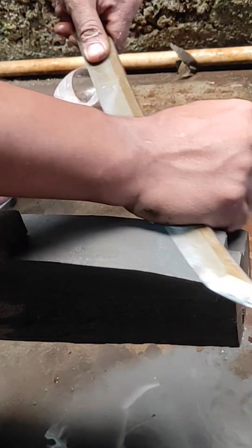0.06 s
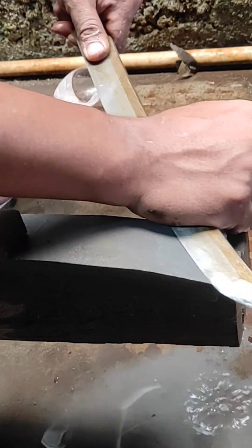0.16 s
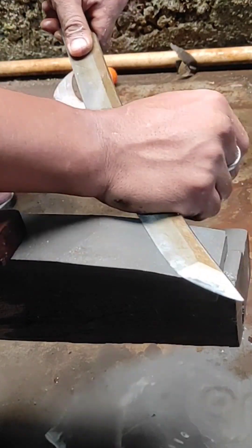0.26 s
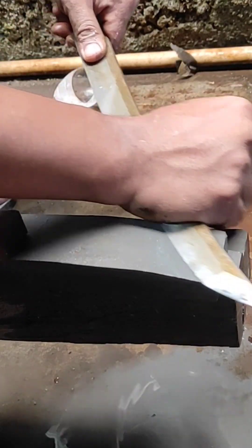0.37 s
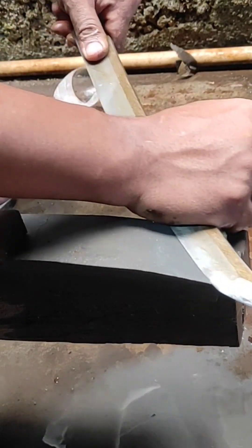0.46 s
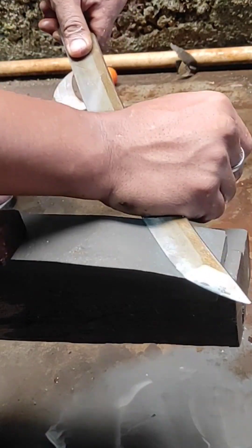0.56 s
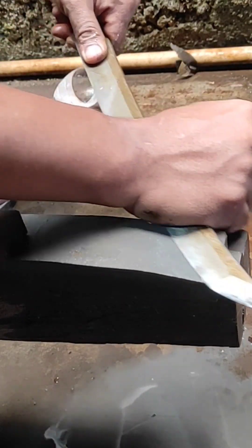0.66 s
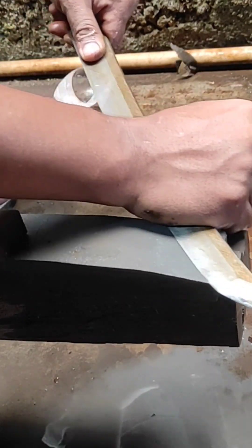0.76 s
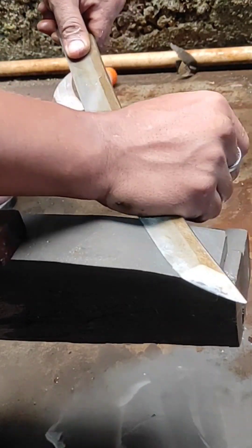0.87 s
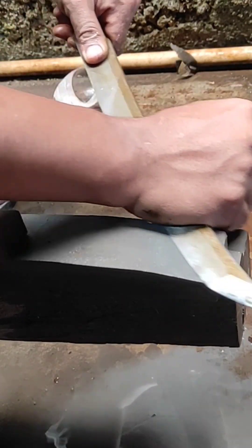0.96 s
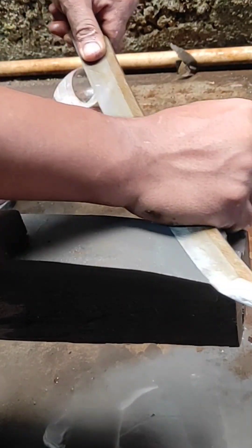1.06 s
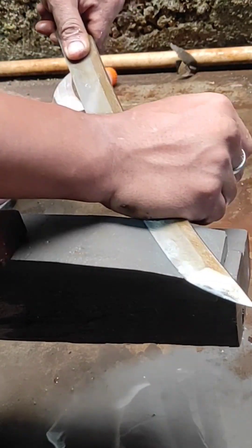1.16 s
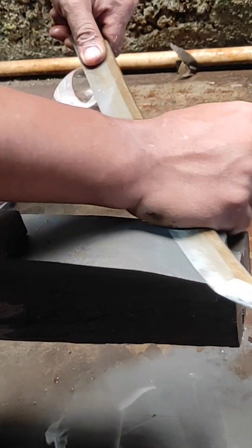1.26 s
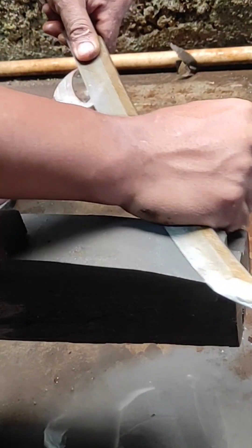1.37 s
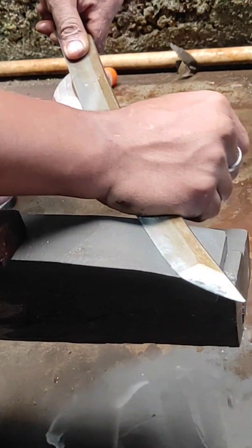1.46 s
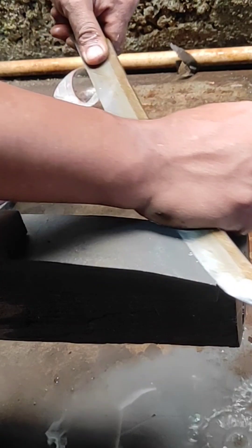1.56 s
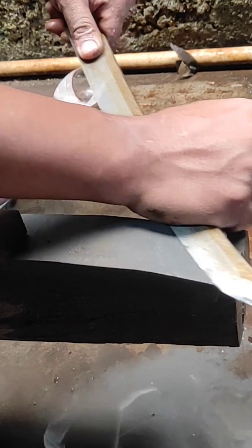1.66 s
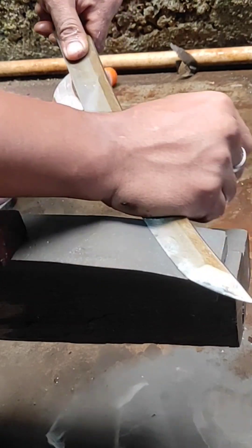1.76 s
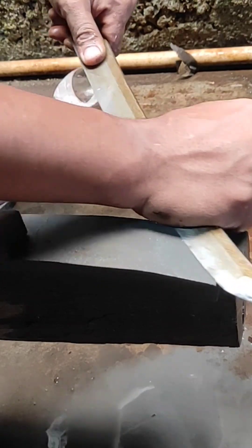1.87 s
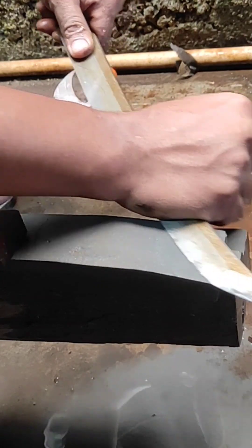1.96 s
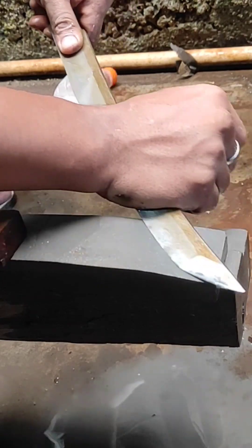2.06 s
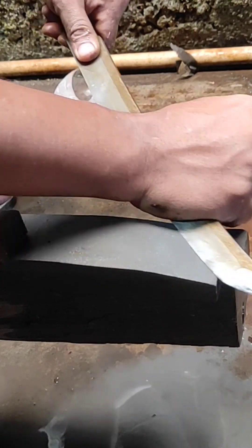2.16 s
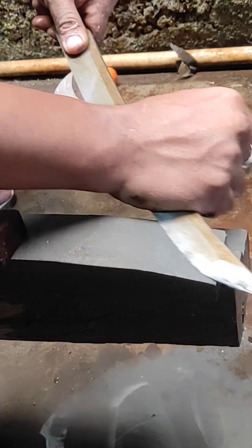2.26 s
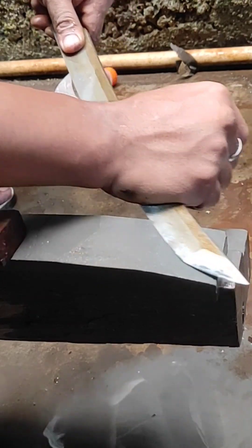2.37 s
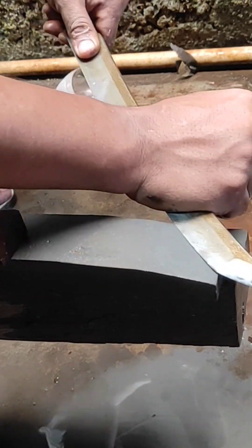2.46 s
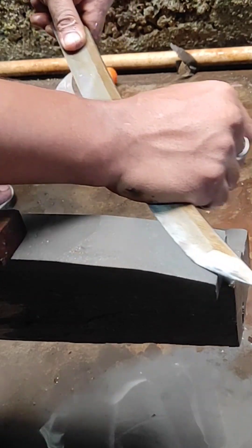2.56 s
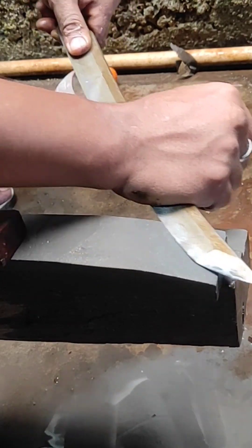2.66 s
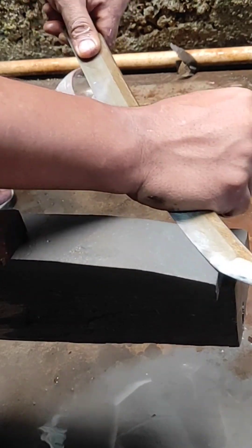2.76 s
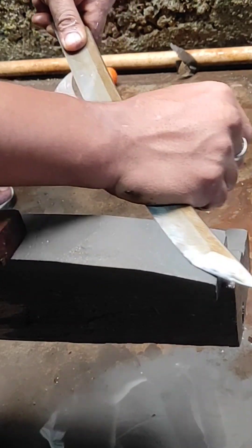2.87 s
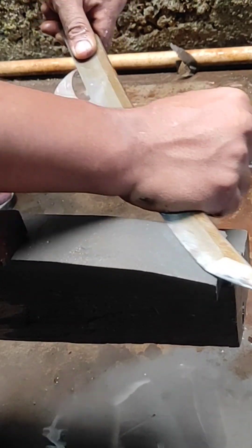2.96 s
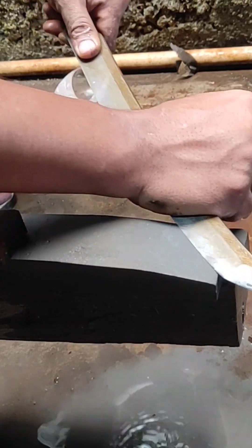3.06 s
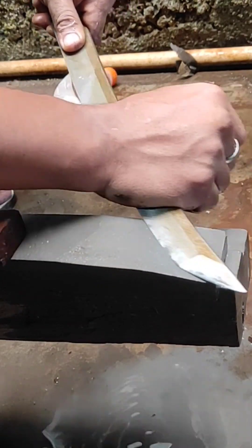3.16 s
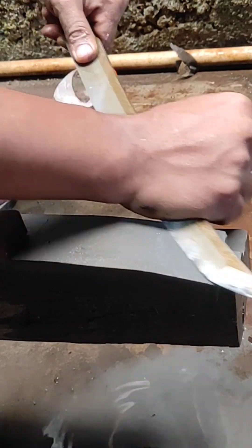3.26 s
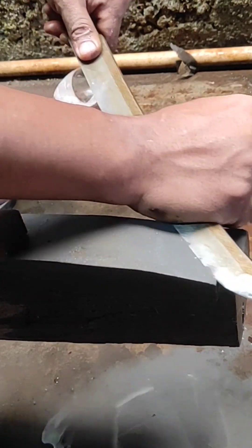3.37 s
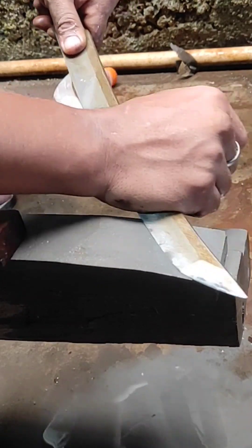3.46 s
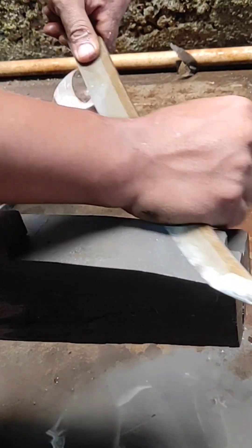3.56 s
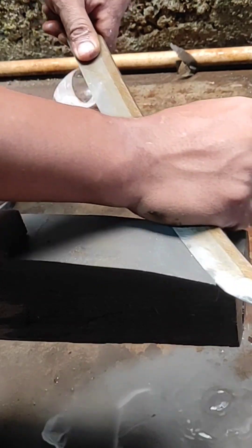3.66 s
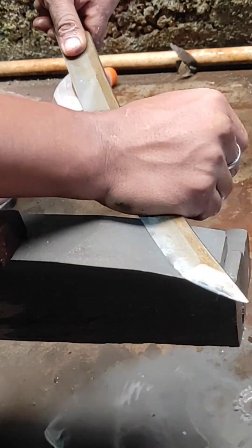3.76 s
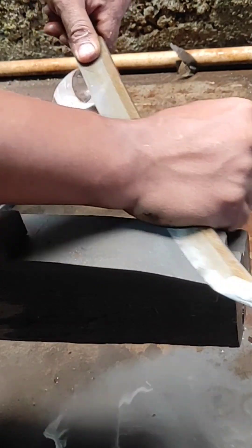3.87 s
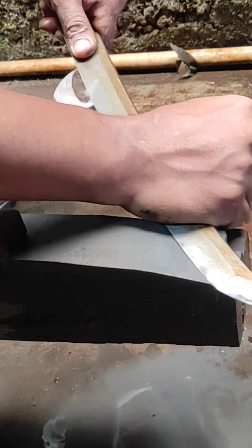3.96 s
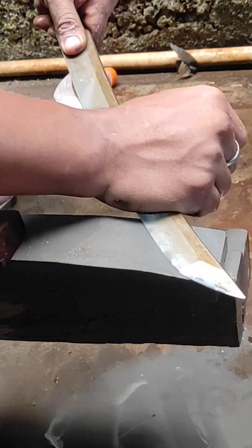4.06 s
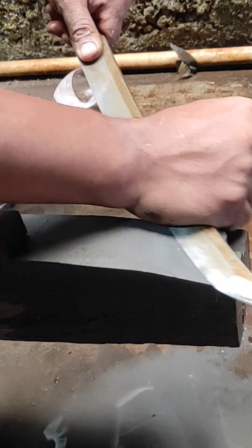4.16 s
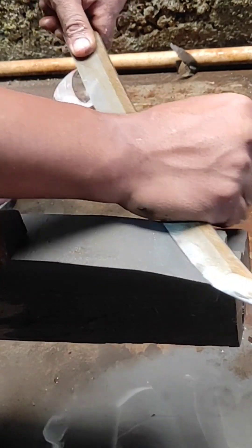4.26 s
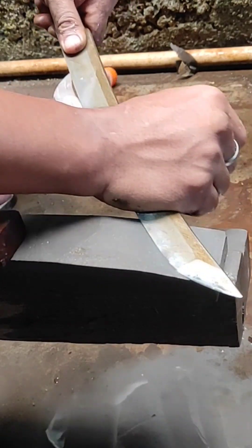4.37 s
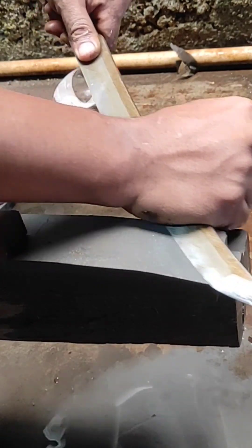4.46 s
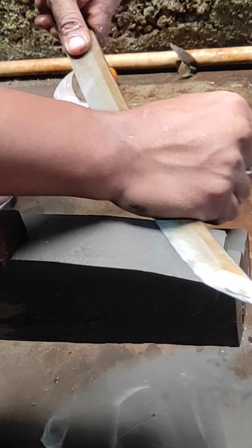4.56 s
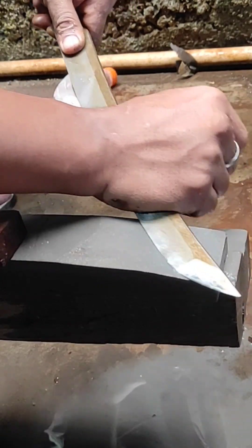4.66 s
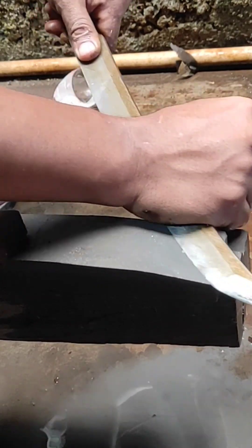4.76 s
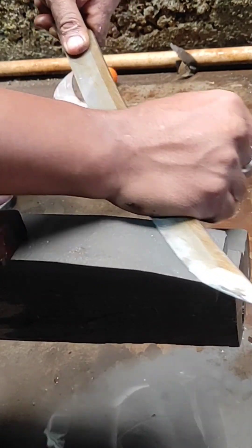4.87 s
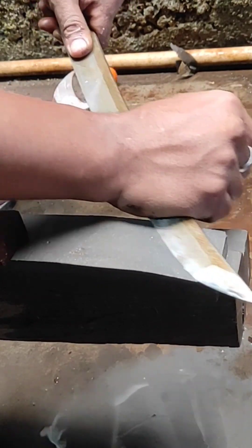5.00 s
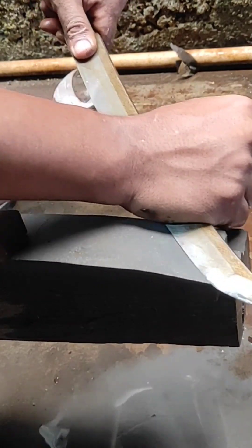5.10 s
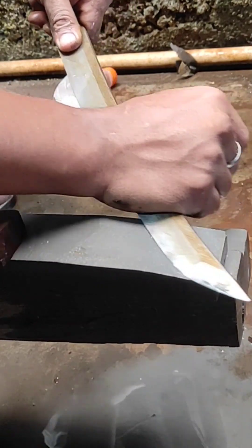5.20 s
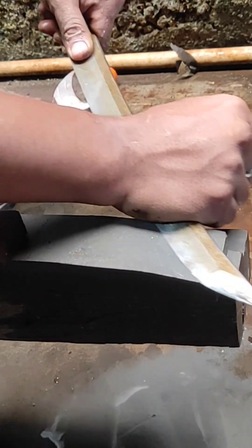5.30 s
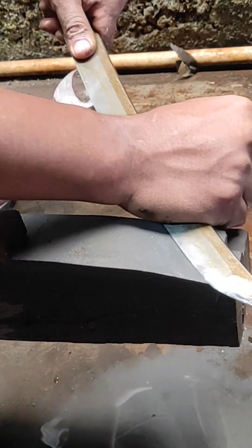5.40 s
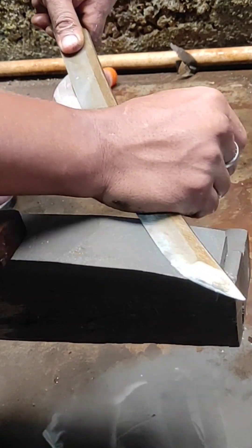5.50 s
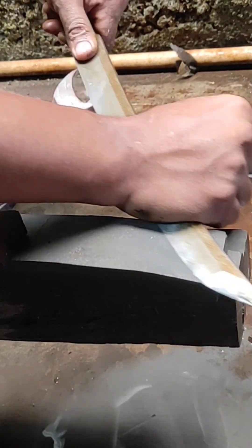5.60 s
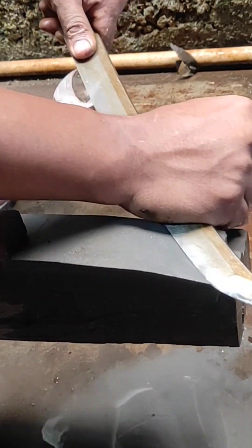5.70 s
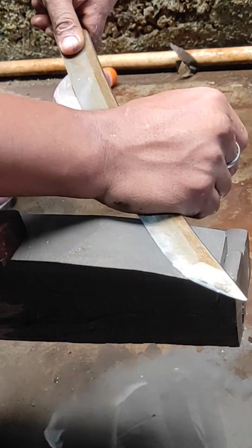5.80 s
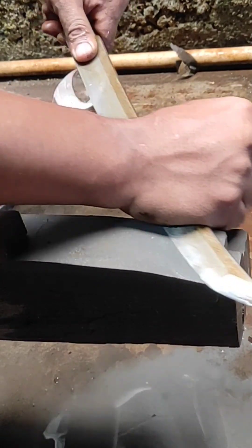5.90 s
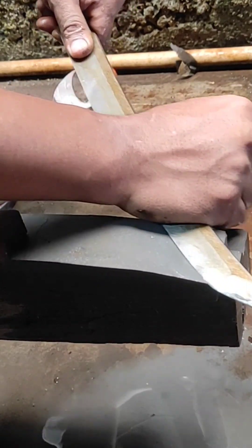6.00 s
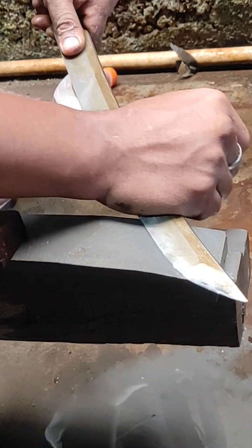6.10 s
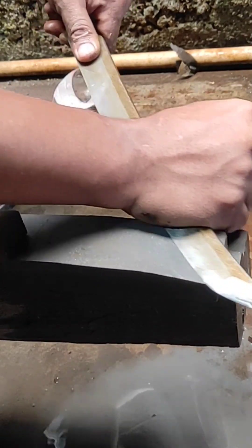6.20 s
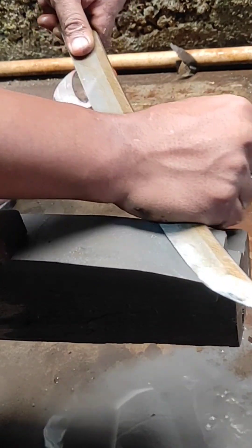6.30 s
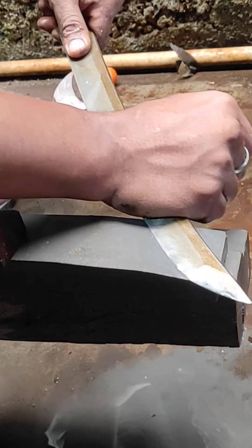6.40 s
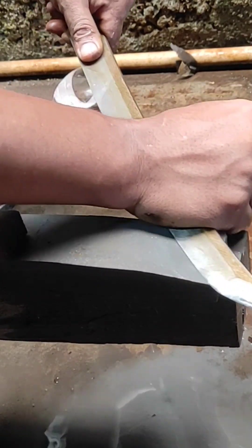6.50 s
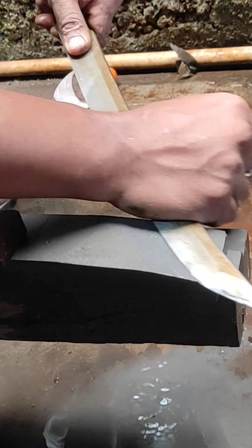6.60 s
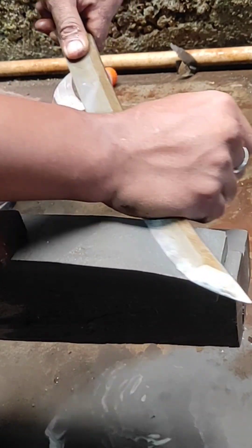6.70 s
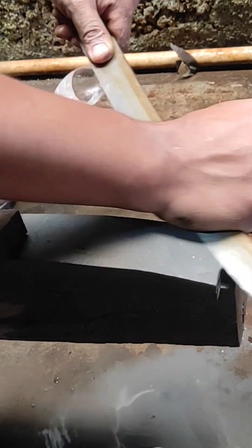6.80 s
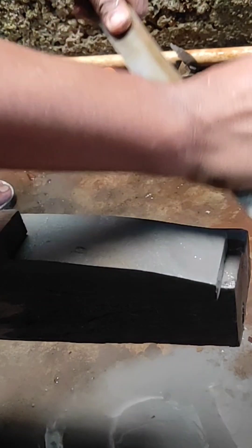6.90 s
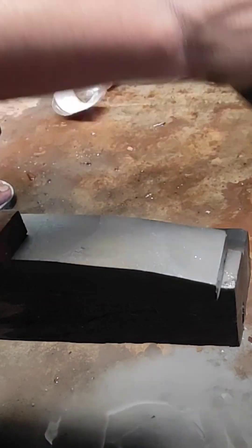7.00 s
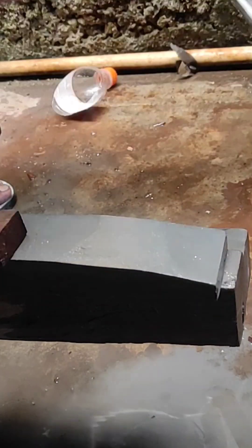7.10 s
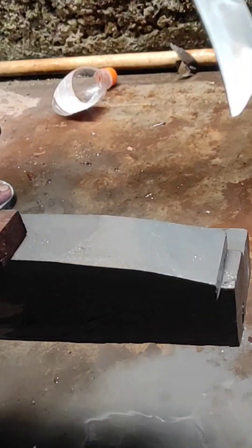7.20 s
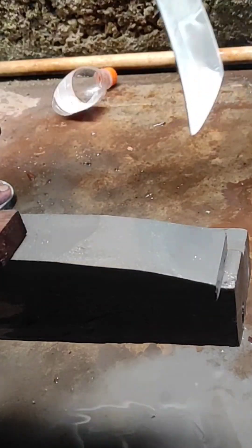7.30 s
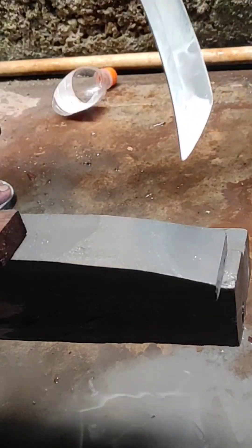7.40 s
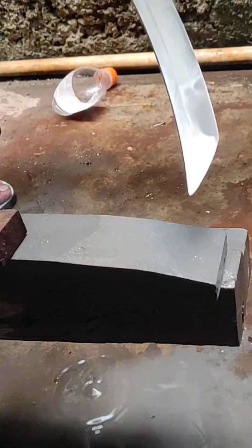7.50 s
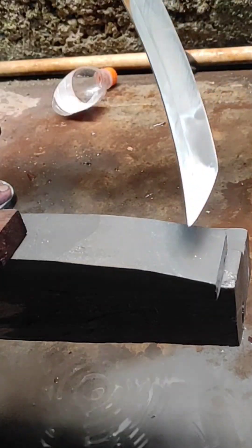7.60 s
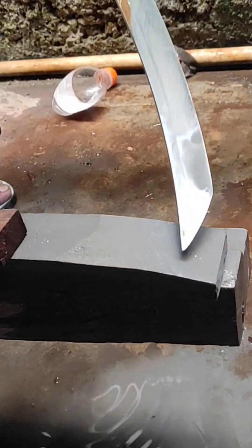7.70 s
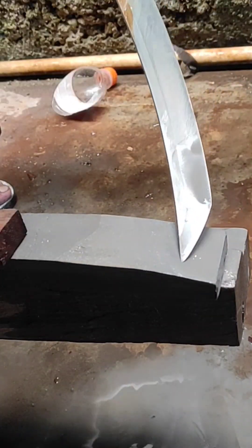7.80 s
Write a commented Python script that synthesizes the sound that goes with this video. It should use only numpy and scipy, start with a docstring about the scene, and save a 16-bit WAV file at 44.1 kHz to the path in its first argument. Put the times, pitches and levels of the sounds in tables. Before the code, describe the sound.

A long steel blade rasps quickly back and forth on a wet whetstone, hissing brightly, then lifts away and its tip ticks down with a short ring.

```python
"""A long steel blade on a wet whetstone, close to a phone: about seven strokes a second, pushed and drawn.
Noise for the grit rasps on the stone and hisses through the blade's resonances; the blade is lifted, faint
noise dies away, and its tip touches down, ringing as decaying sines over a gritty scuff.
The yard walls answer with a short noise tail. Farther off a motorbike passes and engines drone as sines,
road rumble and open air are shaped noise, and a few dull bumps sit low under the scraping."""
import sys
import numpy as np
from scipy import signal
from scipy.fft import rfft, irfft, next_fast_len
from scipy.io import wavfile
from scipy.ndimage import map_coordinates

SR = 44100
rng = np.random.default_rng(int(sys.argv[2]) if len(sys.argv) > 2 else 0)


def store_wav(level_fs):
    """Save 16-bit WAV to argv[1]."""
    pcm = np.round(np.clip(np.atleast_2d(level_fs), -1, 1) * 32767)
    wavfile.write(sys.argv[1], SR, pcm.T.astype(np.int16))


N = 346185  # samples

# The blade pushed, edge first, until the next draw: start_s, steel_hiss_db, stone_rasp_db,
# climb_db (pressure over the stroke), easing_db (of the hand halfway)
PUSH_STROKES = [(0.065, -26.5, -38, 4.0, -0.5), (0.368, -26.5, -37.0, 4, 1.0), (0.657, -27, -37.5, -1.5, 0),
                (0.954, -26, -37.5, 8, 0.5), (1.25, -27.5, -37.5, 5, 1), (1.55, -24, -35.5, -6.5, 0),
                (1.85, -26, -36, -5, 0.0), (2.139, -25.0, -36.5, -7, 0.0), (2.417, -26.5, -38, -4, -1.5),
                (2.689, -28.5, -38, 5, 0.5), (2.974, -28.5, -37.5, -7, -2), (3.26, -26.5, -37.0, 3, 1),
                (3.568, -25.0, -35.5, 2, -1), (3.851, -26.5, -36.5, 2, -0.5), (4.154, -25.5, -36.5, -1, -1),
                (4.441, -26.0, -36.5, 2.0, -1.0), (4.726, -26.5, -38, 2.5, -1.0),
                (5.015, -26.5, -37.5, 3, 0.0), (5.302, -27.5, -38.5, 3, -0.5), (5.593, -27.0, -38.5, 7, -1),
                (5.885, -27.0, -37.5, -1.5, 0), (6.163, -28.0, -38.5, 10, 0), (6.458, -28.0, -38.5, 2, 0),
                (6.744, -24, -37.5, 5, -1)]
# The blade drawn back until the next push: start_s, steel_hiss_db, stone_rasp_db, climb_db, easing_db
DRAW_STROKES = [(-0.074, -30, -36.5, 1, -2.5), (0.201, -31.0, -39.0, 13, 1.5), (0.509, -32.0, -39, 4, 0.0),
                (0.804, -31.5, -38.5, 10, -0.5), (1.098, -33.0, -40.5, 0.5, 2),
                (1.389, -32.5, -39.5, 9, 1.5), (1.688, -31.0, -38.5, 1.5, 1.5),
                (1.98, -28.5, -37.5, 2, 1.0), (2.273, -28, -37, 6, 0.5), (2.553, -30.0, -38, 7.0, -2),
                (2.824, -33, -37.5, 16, -3), (3.13, -30, -37, 2.0, -0.5), (3.406, -31, -38, 0, 1.5),
                (3.7, -32.5, -40.5, 1.5, -2), (3.985, -33.5, -43.5, 4, 0.5), (4.279, -33.5, -43.5, 4, 1),
                (4.565, -35.0, -44.5, 8.0, 1.5), (4.856, -34.5, -43.5, 1, 1.5),
                (5.144, -36.0, -45.5, 13.5, 1.5), (5.43, -35.0, -43, 10.0, 0.5),
                (5.722, -34.5, -42, 9.0, -1), (6.014, -33.5, -42.5, 12, 0), (6.291, -34.5, -44.0, 6, 1.5),
                (6.587, -34.0, -43.0, 5, -0.5)]
LIFT_S = 6.9  # the blade leaves the stone
# Shape of each direction: knee_speed (0-1), extra_rasp_climb_db
PUSH_CURVE = (0.51, 3.2)
DRAW_CURVE = (0.39, 0.89)
RASP_FOLLOWS = 0.51  # dB of rasp per dB of pressure
# Where the edge skates, then suddenly digs in; a row of zero swing does nothing and is skipped:
# at_s, pressure_swing_db (either way)
EDGE_DIGS = [(1.572, 1), (2.157, 2.5), (3.153, 4), (6.183, 0), (6.48, 2.3)]
DIG_ABRUPT_S, DIG_FADE_S = 0.002, 0.015
CATCH_AFTER_S, CATCH_DB = 0.016, 0.3  # every push also catches a little just after the turn
# Resonances of the blade on the stone: centre_hz, width_hz, left_db, right_db,
# draw_db (extra on the way back), likeness (left to right, 0-1), left_lead_rad
BLADE_RESONANCES = [(1085, 247, 7.5, 3.5, -5, 0.13, 1.5), (1718, 460, 8.1, 6, 0.4, 0.44, 1),
                    (2293, 195, 7.5, 9.5, 0, 0.34, -1.1), (2760, 320, 8, 7, -2, 0.56, -4),
                    (3864, 560, 8.5, 10.5, -1.5, 0.4, 2.25), (4750, 260, 3.5, 8.0, 3, 0.4, -3),
                    (5510, 920, 3, 8, 1, 0.4, -2.5), (6370, 200, 1, 7.5, 5.5, 0.5, -1),
                    (6860, 380, -4, 7, -1, 0.06, 1), (7360, 327, 1.5, 8.5, 4, 0.52, -1.5),
                    (7670, 438, 2.5, 9, -5, 0.2, -0.4), (8264, 510, 8.5, 2.6, 4, 0.12, 1.5),
                    (8920, 300, -1, -1.4, -0.5, 0.67, -2.5), (9340, 180, 8.5, 5.5, 5, 0.82, 3)]
# Bare friction of grit on stone: freq_hz, density_db (per Hz)
FRICTION_SPECTRUM = [(60, -32.5), (220, -19), (400, -19.5), (540, -21), (660, -19), (1300, -23.5),
                     (3200, -26.5), (4400, -27.5), (6000, -21.5), (7500, -17), (8700, -18), (9500, -22.5),
                     (10600, -27.5), (12900, -34.5), (14000, -36.5), (15300, -48.5)]
# The tip lands, catches and skids: at_s, ring_db, scuff_db
TIP_CATCHES = [(7.8214, -25.5, -33.5), (7.8272, -30, -33.5), (7.8331, -28.5, -34)]
# Ring of the free blade: pitch_hz, left_db, right_db, t60_s
FREE_BLADE_MODES = [(344, -18, -22, .2), (1930, -29, -31, .15), (2480, -29, -28, 0.13),
                    (3200, -17, -15, 0.22), (3924, -21, -16, .1), (4727, -21, -4, .05),
                    (5680, -21, -7, .06), (6476, -22, -11, .15), (7467, -12, 5.5, 0.11),
                    (8506, -3, -3, .18), (14130, -31, -31, .15)]
# The tip scraping the stone: freq_hz, density_db (per Hz)
SCUFF_SPECTRUM = [(100, -15), (350, -12), (1100, -11.5), (2100, -20.5), (3300, -19), (5500, -13),
                  (7500, -9), (9500, -15), (15000, -38.5)]
# Faint noise after the lift, a slow dying tail, then a brief swish: centre_s, half_length_s, level_db
FAINT_SWELLS = [(7.052, 0.18, -55.5), (7.28, 0.086, -62), (7.53, .045, -56)]
# Decay of the walls' echo: freq_hz, t60_s
WALL_DECAY = [(200, 0.89), (2000, 0.35), (8000, 0.27), (15000, 0.16)]
ECHO_DB = -7
# The motorbike: mean firing rate, Doppler shift either way, moment and half-time of the glide
FIRING_HZ, DOPPLER_HZ, GLIDE_AT_S, GLIDE_S = 43.35, 0.92, 2.85, 0.85
# Its pass, before swells and panning: nearest_s, half_time_s, fifth_order_db
MOTORBIKE_PASS = (1.56, 2.4, -50.5)
# Its exhaust: order (multiple of the firing rate), level_db (relative to the fifth)
EXHAUST_ORDERS = [(2, -16), (3, -18), (4, -7), (5, 0), (6, -9), (7, -15), (8, -16), (9, -17)]
# Its note swells and sinks: centre_s, half_length_s, change_db
MOTORBIKE_SWELLS = [(0.1, 0.2, 2.5), (1.297, 0.15, 9), (1.55, 0.045, -4), (1.767, 0.18, 6),
                    (1.94, 0.033, -12), (2.06, 0.29, 4.5), (2.61, 0.13, -15), (3.113, 0.27, 10.5),
                    (3.518, 0.07, 7.5), (4.317, 0.065, 10.5)]
# Far engines, before panning: start_s, end_s, pitch_hz, level_db
ENGINE_DRONES = [(-.1, 1.8, 118.3, -53), (.3, 2.9, 140.5, -59), (2.1, 2.95, 87.3, -51.5),
                 (4.5, 6.5, 99.5, -53.5), (4.1, 8, 66.5, -61)]
# Other traffic, heard only as rumble, before its trim and panning: nearest_s, half_time_s, level_db
RUMBLE_PASSES = [(0.55, 0.45, -45.5), (3.65, 0.35, -40), (5.1, 1, -45.5)]
# Road rumble: freq_hz, density_db (per Hz)
RUMBLE_SPECTRUM = [(20, -16.5), (45, -4), (90, -0.5), (170, -1), (280, -2), (450, -7), (900, -14.5),
                   (3000, -46)]
# Dull bumps, before panning: start_s, level_db, pitch_hz
BUMPS = [(3.335, -38, 48), (3.39, -34, 80), (3.44, -39, 60), (3.51, -34, 98), (3.564, -34, 90),
         (3.635, -33, 62), (3.642, -38, 184), (3.68, -33.5, 170), (3.73, -33, 126), (3.739, -36, 248)]
# Noise in the bumps: freq_hz, density_db (per Hz)
BUMP_SPECTRUM = [(20, -19), (45, 5), (90, 2), (170, -6), (270, -4), (500, -19), (1500, -60)]
# Outdoor background: freq_hz, density_db (per Hz)
AIR_SPECTRUM = [(15, -42), (25, -10.5), (69, -14.5), (110, -19), (163, -4), (200, -14.5), (250, -25),
                (383, -17), (600, -27.5), (1500, -30), (3440, -34), (5720, -37), (7280, -25.5),
                (9770, -37.5), (13800, -64), (15000, -60)]
# How alike noise is at the two microphones: freq_hz, likeness (0-1)
MIC_LIKENESS = [(60, 1), (290, 0.89), (640, 0.7), (1400, 0.052), (3000, 0), (15000, 0.068)]
# Notches in the treble: centre_hz, width_hz, depth_db
TREBLE_NOTCHES = [(9920, 610, -29.5), (11100, 390, -23), (12350, 260, -6), (13450, 230, -1)]
TOP_HZ = 15450  # band limit


def grinding(rasp_knee=0.32, split_hz=3900, hiss_trim_db=0.24, detune=0.012, vary_db=1.3):
    """Each stroke speeds up and stops under the hand's pressure: stone rasp below split_hz, steel hiss above."""
    sliding = shifting(stereo_noise(FRICTION_SPECTRUM), depth_db=3.4, patch_hz=130, patch_s=0.045)
    # single grains catch for under a millisecond; coarse grit makes the stone judder more slowly
    grain_db = 1.35 * wobble(1300) + 0.3 * wobble(90)
    grit = unit(sliding * amp(grain_db))
    judder = amp(0.9 * wobble(350))
    rows = strokes()
    # per stroke: (early, late) by (detune, level) by resonance
    chance = rng.standard_normal((len(rows), 2, 2, len(BLADE_RESONANCES)))
    out = np.zeros((2, N))
    for (start, end, drawn, hiss_db, rasp_db, climb_db, ease_db), lies in zip(rows, chance):
        knee, extra_climb_db = DRAW_CURVE if drawn else PUSH_CURVE
        span = np.arange(max(0, int(start * SR)), int(end * SR))
        t = span / SR
        done = (t - start) / (end - start)  # 0-1 through the stroke
        speed = np.sin(np.pi * done)
        easing_db = ease_db * np.cos(2 * np.pi * (2 * done - 1)) * speed
        pressure_db = climb_db * (done - 0.5) - easing_db + digging(t)

        # the blade lies differently at the two ends of every stroke
        early, late = [
            filtered(grit[:, span], lambda hz: blade_colour(hz, drawn, detune * shift, vary_db * change))
            for shift, change in lies]
        travelled = np.sin(np.pi * done / 2) ** 2
        scrape = at_both_microphones(early + (late - early) * travelled)

        rasp = filtered(scrape, lambda hz: 1 / (1 + (hz / split_hz) ** 8))
        hiss = scrape - rasp
        hiss_gain = amp(hiss_db + hiss_trim_db + pressure_db) * bite(speed, knee)
        rasp_level_db = rasp_db + RASP_FOLLOWS * pressure_db + extra_climb_db * (done - 0.5)
        rasp_gain = amp(rasp_level_db) * bite(speed, rasp_knee)
        out[:, span] += hiss_gain * unit(hiss)
        out[:, span] += rasp_gain * unit(rasp * judder[span])
    return out


def strokes():
    """Draw and push in turn: start_s, end_s, drawn, steel_hiss_db, stone_rasp_db, climb_db, easing_db."""
    rows = [row for pair in zip(DRAW_STROKES, PUSH_STROKES) for row in pair]
    ends = [row[0] for row in rows[1:]] + [LIFT_S]
    return [(start, end, k % 2 == 0, *levels)
            for k, ((start, *levels), end) in enumerate(zip(rows, ends))]


def bite(speed, knee, creep=0.28):
    """The grit cuts evenly once past the knee speed; at the turns the blade only creeps sideways."""
    cut = speed ** 2 * (1 + knee ** 2) / (speed ** 2 + knee ** 2)
    return np.hypot(creep, cut)


def digging(t):
    """Pressure in dB: it sags while the edge skates and jumps as it digs in."""
    digs = [(s, db) for s, db in EDGE_DIGS if db != 0]
    catches = [(start + CATCH_AFTER_S, CATCH_DB) for start, *_ in PUSH_STROKES]
    return sum(db * np.tanh((t - s) / DIG_ABRUPT_S) * np.exp(-np.abs(t - s) / DIG_FADE_S)
               for s, db in digs + catches if t[0] < s < t[-1])


def shifting(x, depth_db, patch_hz, patch_s):
    """Narrow random peaks and dips that come and go in the scraping noise."""
    hz, t, z = signal.stft(x, SR, nperseg=1024)
    knots = rng.standard_normal((int(t[-1] / patch_s) + 4, int(hz[-1] / patch_hz) + 4))
    field = map_coordinates(knots, np.meshgrid(t / patch_s, hz / patch_hz), order=2)
    field = np.minimum(field, 1.2)  # peaks are limited
    return signal.istft(z * amp(depth_db * field), SR, nperseg=1024)[1][:, :N]


def blade_colour(hz, drawn, detune, change_db):
    """Left and right gain of the blade's resonances for one way of lying on the stone."""
    centre, width, left_db, right_db, draw_db, *_ = np.transpose(BLADE_RESONANCES)
    offset = hz - (centre * (1 + detune))[:, None]
    peaks = 1 / (1 + (offset / (width[:, None] / 2)) ** 2)
    heights_db = np.array([left_db, right_db]) + drawn * draw_db + change_db
    return amp(heights_db @ peaks)


def at_both_microphones(x):
    """Each resonance reaches the two microphones partly as one wave, with its own phase between them."""
    centre, width, *_, likeness, lead = np.transpose(BLADE_RESONANCES)

    def shared(hz):
        near = np.exp(-((hz - centre[:, None]) / width[:, None]) ** 2)
        return (likeness * np.exp(-1j * lead)) @ near

    def own(hz):
        return np.sqrt(np.clip(1 - np.abs(shared(hz)) ** 2, 0, 1))

    right = filtered(x[0], shared) + filtered(x[1], own)
    return np.array([x[0], right])


def tip_touch(scuff_t60=0.071, attack=0.0008):
    """The tip lands and skids: every catch feeds the ring of the free blade and adds a gritty scuff."""
    out = np.zeros((2, N))
    scuff = unit(stereo_noise(SCUFF_SPECTRUM) * amp(1.5 * wobble(900)))
    phases = rng.uniform(0, 2 * np.pi, (len(FREE_BLADE_MODES), 2, 1))
    for s, ring_db, scuff_db in TIP_CATCHES:
        first = int(s * SR)
        t = np.arange(N - first) / SR
        ring = np.zeros((2, N - first))
        for (hz, left_db, right_db, t60), phase in zip(FREE_BLADE_MODES, phases):
            fade = amp(np.array([[left_db], [right_db]]) - 60 * t / t60)
            ring += fade * np.sin(2 * np.pi * hz * (t + first / SR) + phase)
        skid = amp(scuff_db - 60 * t / scuff_t60) * scuff[:, first:]
        out[:, first:] += (1 - np.exp(-t / attack)) * (amp(ring_db) * ring + skid)
    return out


def faint_noise():
    """Faint noise after the lift: a slow dying tail, then a brief swish, from bell-shaped swells."""
    t = np.arange(N) / SR
    level = sum(amp(db) * np.exp(-((t - s) / half_s) ** 2) for s, half_s, db in FAINT_SWELLS)
    return level * unit(stereo_noise(SCUFF_SPECTRUM) * amp(2 * wobble(60)))


def yard(x):
    """The walls' answer: a half-second noise tail whose treble dies first."""
    hz, t, z = signal.stft(rng.standard_normal((2, SR // 2)), SR, nperseg=256)
    decay = amp(-60 * t / along(WALL_DECAY, hz)[:, None])
    tail = signal.istft(z * decay, SR, nperseg=256)[1]
    return signal.fftconvolve(x, tail / np.linalg.norm(tail[0]), axes=1)[:, :N]


def traffic():
    """Distant motorbike, droning engines and road rumble, all to the left."""
    tones = motorbike() + drones()
    # the root of two makes the tone levels rms
    return panned(np.sqrt(2) * tones + road_rumble(), left_db=6.0)


def motorbike(smear=0.69):
    """Low exhaust orders follow a firing rate that glides down by Doppler; many paths scramble their phases."""
    t = np.arange(N) / SR
    firing_hz = FIRING_HZ - DOPPLER_HZ * np.tanh((t - GLIDE_AT_S) / GLIDE_S)
    turns = np.cumsum(firing_hz) / SR
    note = np.zeros(N)
    for order, db in EXHAUST_ORDERS:
        phase = 2 * np.pi * (order * turns + rng.random()) + smear * wobble(6)
        note += amp(db + wobble(4.43)) * np.sin(phase)
    swell_db = sum(db * np.exp(-((t - s) / half_s) ** 2) for s, half_s, db in MOTORBIKE_SWELLS)
    return pass_by(t, *MOTORBIKE_PASS) * amp(swell_db) * note


def drones():
    """Far engines, each a single fluttering low tone that fades in and out over a quarter second."""
    t = np.arange(N) / SR
    out = np.zeros(N)
    for start, end, hz, db in ENGINE_DRONES:
        fade = np.clip(np.minimum(t - start, end - t) / 0.25, 0, 1)
        out += amp(db + 1.9 * wobble(8)) * fade * np.sin(2 * np.pi * hz * t)
    return out


def road_rumble(trim_db=-1.0):
    """Low noise under the summed power of vehicles driving past."""
    t = np.arange(N) / SR
    road = np.sqrt(sum(pass_by(t, *row) ** 2 for row in RUMBLE_PASSES))
    return amp(trim_db) * road * stereo_noise(RUMBLE_SPECTRUM)


def pass_by(t, nearest, half_s, db):
    """Gain of a source that drives past on a straight road: one over its distance."""
    return amp(db) / np.hypot(1, (t - nearest) / half_s)


def thuds(rise=0.01, noise_db=-7):
    """Dull, low bumps under the scraping: a short sine with some noise, peaking after rise seconds."""
    out, low = np.zeros((2, N)), stereo_noise(BUMP_SPECTRUM)
    for s, db, hz in BUMPS:
        t = np.maximum(np.arange(N) / SR - s, 0)
        envelope = t / rise * np.exp(1 - t / rise)
        out += amp(db) * envelope * (np.sin(2 * np.pi * hz * t) + amp(noise_db) * low)
    return panned(out, left_db=3)


def open_air():
    """Steady outdoor background noise whose level sways slowly."""
    sway_db = 1.1 * wobble(4)
    return amp(-49.0 + sway_db) * stereo_noise(AIR_SPECTRUM)


def stereo_noise(spectrum):
    """Coloured noise of rms 1, alike at both microphones in the bass only."""
    def mid_and_side(hz):
        turn = np.arccos(np.clip(along(MIC_LIKENESS, hz), -1, 1)) / 2
        return amp(along(spectrum, hz)) * [np.cos(turn), np.sin(turn)]

    mid, side = filtered(rng.standard_normal((2, N)), mid_and_side)
    return unit(np.array([mid + side, mid - side]))


def panned(x, left_db):
    """Louder on the left by left_db."""
    return x * amp([[left_db / 2], [-left_db / 2]])


def filtered(x, response):
    """x times a response of frequency."""
    n = x.shape[-1]
    m = next_fast_len(n + 2048, True)
    return irfft(rfft(x, m) * response(np.fft.rfftfreq(m, 1 / SR)), m)[..., :n]


def wobble(rate):
    """A smooth random curve, rate knots a second."""
    knots = rng.standard_normal(int(N * rate / SR) + 4)
    coarse = np.arange(0, N, 16)
    return np.interp(np.arange(N), coarse, map_coordinates(knots, [coarse * rate / SR]))


def along(points, hz):
    """(freq_hz, value) points read on a log frequency axis."""
    f, v = np.transpose(points)
    return np.interp(np.log(hz + 1), np.log(f + 1), v)


def unit(x):
    """Scaled to rms 1."""
    return x / np.sqrt(np.mean(x ** 2) + 1e-20)


def amp(db):
    """Decibels to gain."""
    return 10 ** (np.asarray(db) / 20)


def scene():
    """The blade close by, its echo, faint noise after the lift, the road, low bumps and the open air."""
    blade = grinding() + tip_touch()
    echo = amp(ECHO_DB) * yard(blade)
    return blade + echo + faint_noise() + traffic() + thuds() + open_air()


def record(dry):
    """The treble is notched; nothing is kept above the band limit."""
    def response(hz):
        notch_db = sum(db * np.exp(-((hz - centre) / (width / 2)) ** 2) for centre, width, db in TREBLE_NOTCHES)
        return amp(notch_db) * (hz < TOP_HZ)

    return filtered(dry, response)


dry = scene()
out = record(dry)
store_wav(out)
```